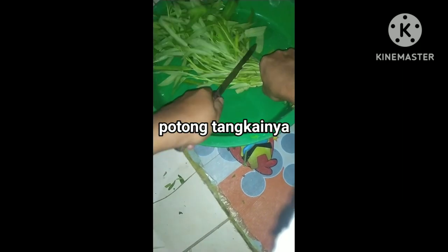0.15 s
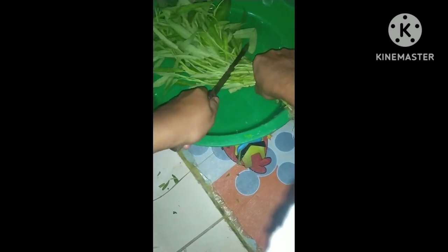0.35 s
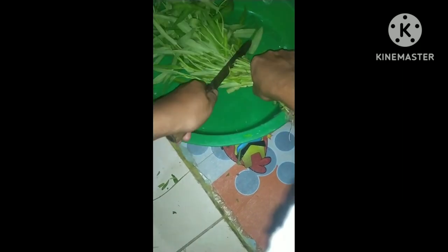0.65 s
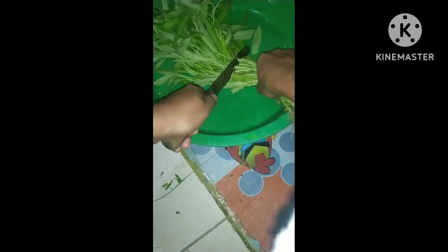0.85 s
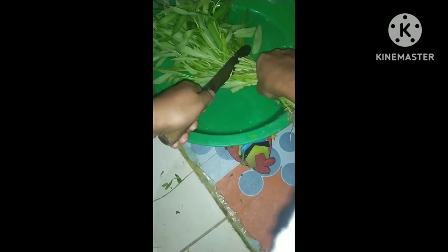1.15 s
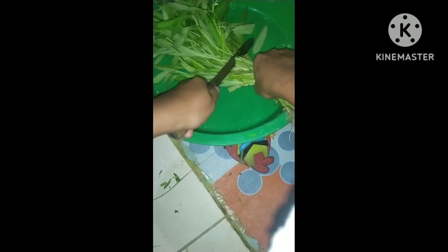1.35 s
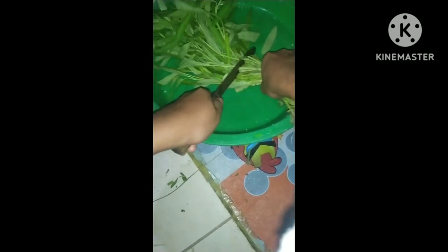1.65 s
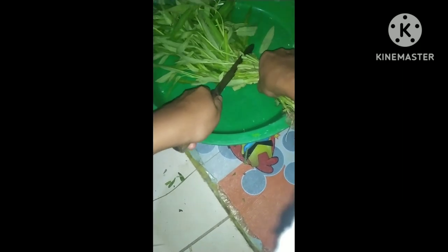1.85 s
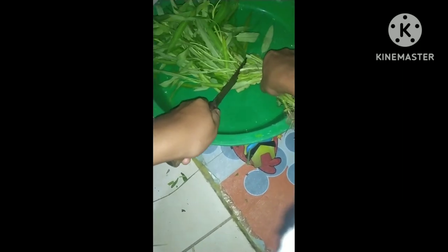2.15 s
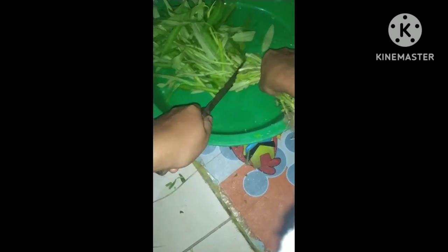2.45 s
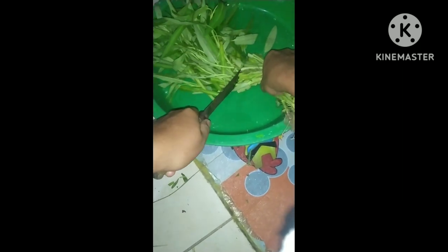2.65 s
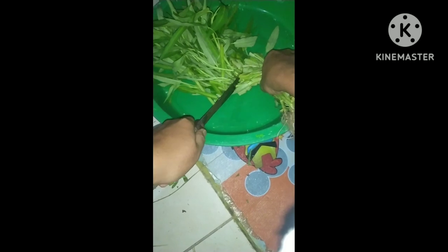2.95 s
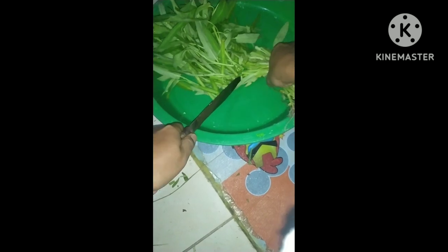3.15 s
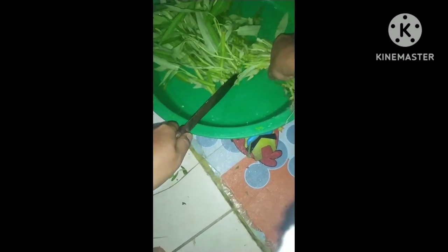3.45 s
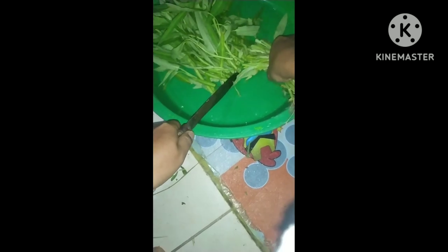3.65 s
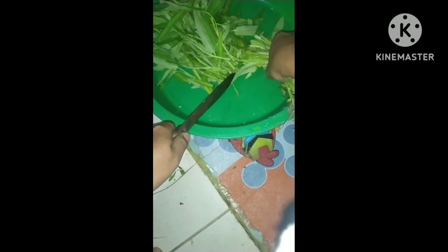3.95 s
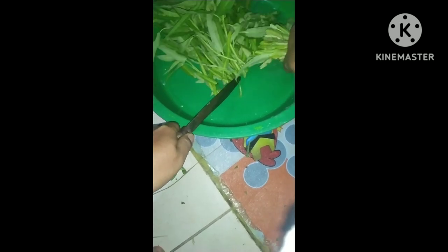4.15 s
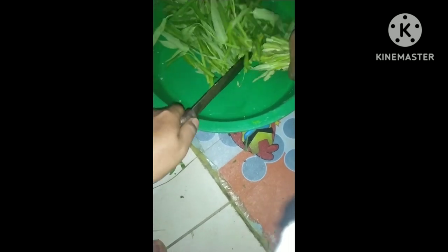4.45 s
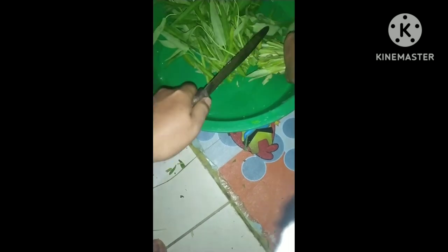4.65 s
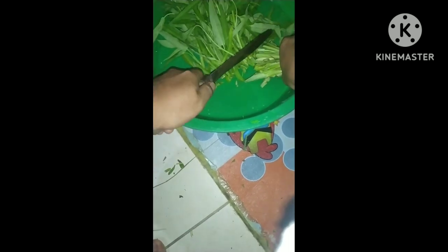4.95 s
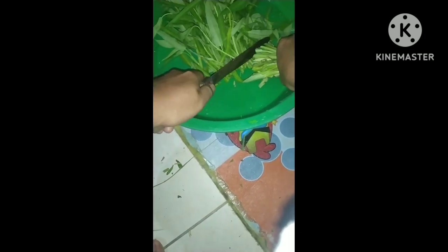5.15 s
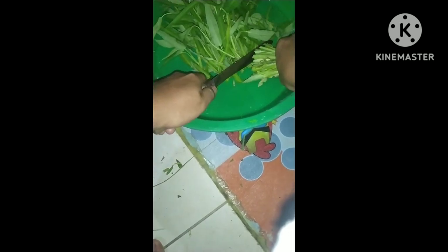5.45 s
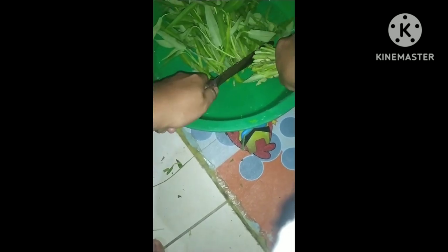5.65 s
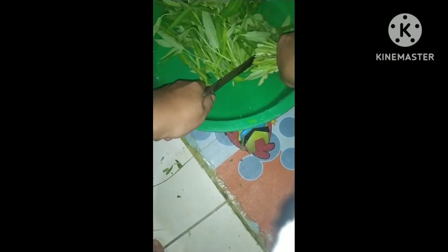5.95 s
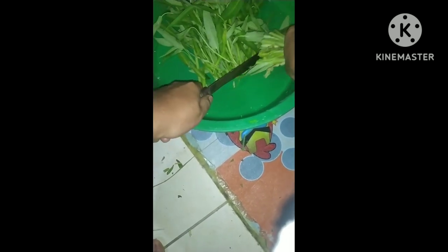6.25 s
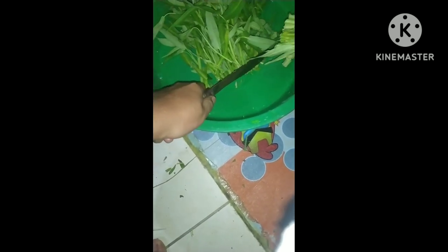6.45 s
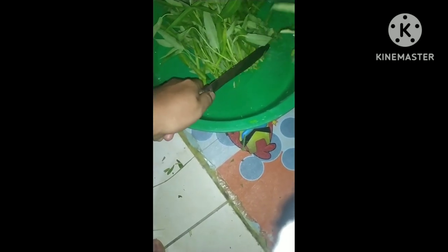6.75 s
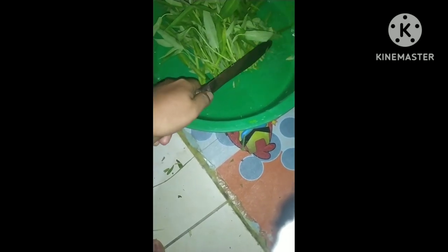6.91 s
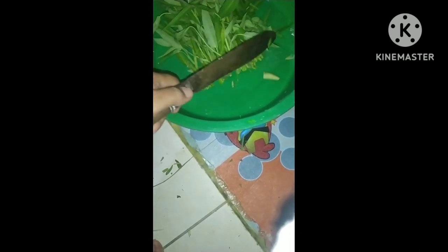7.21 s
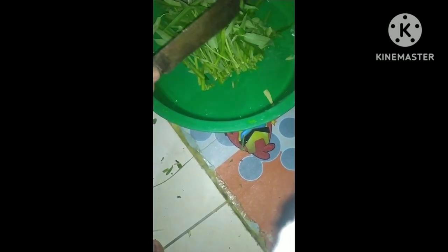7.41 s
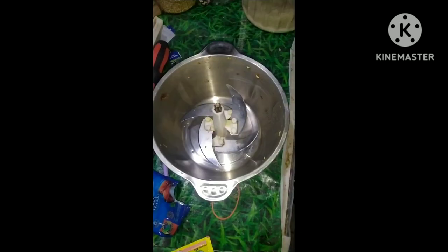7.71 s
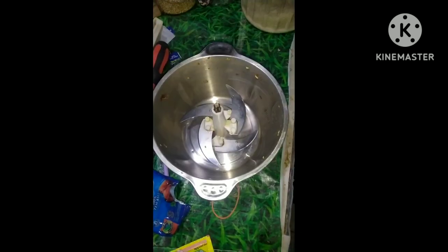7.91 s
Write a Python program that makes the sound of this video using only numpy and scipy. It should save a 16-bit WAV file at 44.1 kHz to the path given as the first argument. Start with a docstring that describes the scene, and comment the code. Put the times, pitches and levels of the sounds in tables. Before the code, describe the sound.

Irregular fibrous crunches, woody little snaps and blade rasps from stems being cut, clearer and brighter on the left, duller on the right, with short hard room reflections. After three seconds of busy cutting come dull case knocks and plastic bowl taps, a quiet gap, a few more crunches around six seconds, then soft swishes of hands and leaves. Faint deep motor hum and slight hiss run underneath until a late drop.

```python
"""A motor hums and throbs as a knife starts pressing through crisp leafy stems over a plastic bowl in a tiled room.
Leaves and fibres are coloured grains, snaps and late faint ticks are bursts of clicks, bowl and mic case ring modes.
Squeaks, a drone swell, blade rasps, case bumps, bowl taps and brushing hands follow; the hum drops near the end.
The left microphone faces the bowl; the right one is shadowed and slightly late."""
import sys
import numpy as np
from scipy import signal
from scipy.fft import rfft, irfft
from scipy.io import wavfile
from scipy.ndimage import uniform_filter1d

SR = 44100
rng = np.random.default_rng(int(sys.argv[2]) if len(sys.argv) > 2 else 0)


def materialize(psi):
    """Save the field psi as 16-bit PCM at rate SR to the path in sys.argv[1].

    A 1-D psi becomes a single channel; in a 2-D psi each row is a channel.
    """
    bounded = np.clip(np.atleast_2d(psi).T, -1, 1)
    quanta = np.round(bounded * 32767).astype(np.int16)
    wavfile.write(sys.argv[1], SR, quanta)


N = 356239
HIT = SR // 4
HIT_T = np.arange(HIT) / SR

# background spectra, before a common trim: [hz, level_db]
AIR_LEFT = [(20, -35), (36, -28.5), (50, -6), (75, -10), (105, -15), (130, -19.5), (190, -18), (300, -29),
            (420, -19), (520, -27), (620, -35), (1200, -35), (2800, -47), (15000, -51.5)]
AIR_RIGHT = [(20, -47.5), (36, -29), (50, -10.5), (75, -13.5), (105, -15), (130, -22), (190, -24),
             (300, -30), (420, -41.5), (620, -36.5), (1200, -43), (2800, -46.5), (15000, -51)]
# motor harmonics: [multiple of HUM_HZ, left_rms_db, right_rms_db]
HUM = [(1, -58, -58), (2, -61, -62.5), (3, -65.5, -67), (4, -76.5, -80.5), (8, -69.5, -80), (9, -69.5, -79),
       (10, -63, -87)]
HUM_HZ, HUM_WOW_SHARE, HUM_WAVER_DB = 49.02, 0.0007, 1.0
# motor throb, relative to its base levels: [time_s, level_db]
THROB = [(0, 2.5), (4, 0.5), (4.9, 7.5), (5.8, -3.5), (6.6, 4), (7.9, 6.5)]
# late drop of the background; hiss drop includes the harmonics
HUSH_S, HUSH_FADE_S, HUSH_THROB_DB, HUSH_HISS_DB = 7.88, 0.059, -22, -10

# blade pushes and bunch shifts: [start_s, hold_s, rustle_db, crackle_db]
STROKES = [(0.0, 0.12, -56, -61), (0.235, 0.061, -52.5, -61.5), (0.433, 0.095, -51.5, -64.5),
           (0.637, 0.079, -52.5, -69), (0.815, 0.17, -55, -64), (1.444, 0.24, -54, -66.5),
           (1.596, 0.12, -48.5, -63), (1.738, 0.11, -55, -76), (2.027, 0.08, -47, -57),
           (2.197, 0.049, -55, -64), (2.349, 0.053, -54, -70), (2.538, 0.15, -53.5, -66),
           (2.779, 0.075, -50, -60.5), (3.069, 0.063, -48, -62), (3.383, 0.069, -54, -76),
           (3.942, 0.18, -61, -77), (4.144, 0.18, -57, -66), (4.35, 0.49, -68.5, -79),
           (5.925, 0.028, -53, -76), (6.036, 0.12, -50.5, -75), (6.261, 0.011, -55.5, -68),
           (6.327, 0.027, -55.5, -66), (6.444, 0.62, -70.5, -86)]
ATTACK_S, RELEASE_S = 0.039, 0.043
# restless bunch between strokes
IDLE_RUSTLE_DB, IDLE_CRACKLE_DB = -84, -77
# relative colour of rubbed leaves: [hz, level_db]
RUSTLE = [(200, -1), (600, -8.5), (950, -2), (1450, 1.5), (1900, -8.5), (2300, -9.5), (2900, -18.5),
          (4500, -22), (7000, -37), (16000, -38.5)]
# hollow resonance of rubbed stems, dB re plain rustle
RASP_HZ, RASP_WIDTH_HZ, RASP_DB = 1510, 120, -5.5

# stems snapping and, late on, faint ticks of flicked leaves or handling:
# [time_s, body_peak_db, crack_db re body, hollow_pitch_hz]
SNAPS_AND_TICKS = [(0.0057, -46.5, 0.5, 1620), (0.0576, -42.5, -1.5, 1380), (0.1092, -36.5, -1.5, 1340),
                   (0.124, -50, 5, 1400), (0.1286, -43.5, 7, 1240), (0.2565, -37, -11, 1480),
                   (0.2593, -34.5, -5.5, 1610), (0.319, -43, 3, 920), (0.3399, -49.5, 4, 1630),
                   (0.472, -37, -24, 1440), (0.486, -37, -4, 1390), (0.6344, -39.5, 1.5, 1490),
                   (0.678, -48, -1, 1450), (0.686, -35.5, -20, 1100), (0.703, -42.5, -16, 1400),
                   (0.797, -39, -20, 1460), (0.827, -44.5, -31, 1540), (0.8514, -39.5, 0, 1350),
                   (0.8831, -40.5, 5.5, 1210), (0.935, -37.5, -9.5, 1430), (0.9475, -40.5, 4.5, 1240),
                   (0.977, -42.5, 1, 1170), (1.63, -35.5, -19, 1240), (1.674, -44, -12, 2030),
                   (1.7725, -28.5, -12, 1420), (1.975, -34.5, -12, 1150), (2.012, -38.5, 1.5, 1480),
                   (2.026, -41, -6, 1700), (2.031, -41, -17, 1350), (2.038, -45, 2.5, 1500),
                   (2.047, -37, -2.5, 1220), (2.058, -41, -8, 1400), (2.0862, -31.5, -9.5, 1390),
                   (2.1068, -31, -12, 1550), (2.121, -50, 3, 1400), (2.156, -41.5, -3, 1510),
                   (2.1611, -47.5, -3, 1600), (2.194, -51, 0, 1510), (2.201, -37, -2.5, 1300),
                   (2.212, -46, 2, 1620), (2.222, -43.5, -11, 1650), (2.352, -51, -8, 1700),
                   (2.368, -43.5, -15, 1490), (2.525, -52, 4, 1400), (2.53, -50, 4, 1510),
                   (2.555, -39.5, -5, 1620), (2.571, -32.5, -3.5, 1450), (2.599, -31, 5, 1240),
                   (2.611, -35, -4, 1400), (2.6778, -38.5, -1, 1600), (2.747, -36, -4.5, 940),
                   (2.7688, -31, -9.5, 1450), (2.7942, -45, -0.5, 1240), (2.825, -38, -7, 1100),
                   (2.836, -33, -12.5, 1080), (3.022, -45.5, -1.5, 1415), (3.048, -35, -22, 1400),
                   (3.055, -37, -8.5, 1480), (3.0701, -14.5, -8.5, 1350), (3.08, -34, -21, 1550),
                   (3.086, -30.5, -7, 1480), (3.094, -31, -13, 1470), (3.1095, -34, -9, 1500),
                   (3.124, -40, -6, 1490), (3.13, -36, -5, 1420), (3.143, -37.5, -14, 1530),
                   (3.158, -48, -6, 1510), (3.175, -43, 0.5, 1390), (4.2717, -27.5, -12, 1460),
                   (4.773, -54, -17, 1480), (4.851, -61, -18, 1520), (5.537, -55, -23, 1310),
                   (5.702, -53, -13, 970), (5.843, -52, -17, 1430), (5.921, -31, -6, 1520),
                   (5.928, -38.5, -16, 1100), (6.002, -28.5, -21, 1580), (6.0365, -33, -11, 1490),
                   (6.059, -37, -21, 1500), (6.075, -39, -21, 1450), (6.101, -38, -16, 1510),
                   (6.2586, -42, -16.5, 1720), (6.34, -38.5, -15, 1510), (6.3503, -29, -11, 1550),
                   (6.368, -41, -25, 1510), (6.493, -50, -37, 1570), (6.711, -57, -24, 1170),
                   (6.847, -54, -22, 1200), (7.362, -56, -15, 1420), (7.802, -52, -12, 1390)]
# relative colours of a snap or tick: [hz, level_db]; CRACK also colours the fibres
SNAP_BODY = [(100, -40), (330, -7), (480, 4.5), (650, -11.5), (1000, 2), (1250, -2), (1540, 3.5),
             (1850, -2.5), (2350, -11.5), (2900, -16), (3700, -10.5), (5500, -26.5), (15000, -42.5)]
CRACK = [(300, -6), (900, -1), (1800, 6), (2400, 4), (2800, 2), (3250, -4.5), (3700, -0.5), (4100, -1),
         (4550, -2.5), (5300, -6.5), (7500, -6.5), (11500, -13), (13300, -11), (16000, -12)]
# 60 dB decay of the bursts, longer when loud
BREAK_S, BREAK_OCT_PER_DB = 0.0088, 0.13
HOLLOW_WIDTH_HZ = 210
# treble limit of a middling stem; crisp raises it, thick lowers it
CRACK_TOP_HZ, MIDDLING_DB, MIDDLING_CRACK_DB = 9700, -22, -9.5
CRISP_OCT_PER_DB, THICK_OCT_PER_DB = 1.08, 0.18
# crack resonance, different each time
FIBRE_HZ, FIBRE_SCATTER_OCT = 3800, 0.55
# fibres that outlast the break
LAST_FIBRES_PER_S, LAST_FIBRES_DB, LAST_FIBRES_S = 120, -23, 0.022
# thin stems: peak re stroke rustle, crack re crackle-to-rustle balance
THIN_DB, THIN_CRACK_DB = -2, 10.5
STEM_HZ, STEM_SCATTER_OCT = 1500, 0.2

# faint squeaks: [time_s, peak_db, pitch_hz, length_s]
SQUEAKS = [(0.664, -53, 633, 0.12), (1.59, -51, 866, 0.1)]
# one drone swell: [start_s, hold_s, level_db, centre_hz]
DRONE_SWELL = (1.1, .27, -58.5, 420)
# blade sliding along wet stems: [start_s, hold_s, level_db, rasp_pitch_hz]
SLIDES = [(1.436, 0.033, -54.5, 1410), (2.03, 0.1, -55, 1400), (3.415, 0.077, -56.5, 1470),
          (3.93, 0.13, -72, 1370), (4.134, 0.17, -59, 1470), (4.325, 0.12, -58.5, 1520),
          (6.032, 0.086, -54, 1470)]
SLIDE_WIDTH_HZ, SLIDE_WANDER_OCT, SLIDE_ROUGH_DB = 300, 0.06, 3.5

# case bumps, before layer trims: [time_s, level_db, tick_db re level, sway_db re level, sway_hz, tick_top_hz]
BUMPS = [(1.7153, -20, 3.5, -5, 69, 16000), (3.3418, -19, 1, -5, 66, 15600),
         (3.3645, -24.5, 9, 2, 85, 7000), (3.387, -32, -1, -1, 147, 6960),
         (3.392, -27.5, 0.5, -0.5, 148, 7100), (4.385, -29, 4, 4, 77, 16000),
         (4.3996, -24, 3.5, 1.5, 73.5, 15000), (4.4866, -19, 0.5, -3, 107, 14000),
         (4.4959, -31, 9.5, -11, 146, 9000), (4.504, -38.5, -15, -7, 161, 9000),
         (4.5159, -33, -4, 2, 101, 12000), (4.523, -31, -5, -3, 99, 13000)]
# case modes, before scatter: [hz, level_db, t60_s]
CASE = [(200, -6.5, 0.016), (257, -5, 0.0268), (348, 2.5, 0.022), (448, 1, 0.038), (714, -7.5, 0.019),
        (1054, -5.5, 0.012)]
# relative colours of tick and dull knock: [hz, level_db]
TICK = [(600, -50), (1600, 9), (2400, 8.5), (3300, 8.5), (5000, -7), (7200, -6.5), (9500, 1.5),
        (12500, 0.5), (16000, 6.5)]
KNOCK = [(25, -17.5), (60, 12.5), (200, -3), (400, -10.5), (600, -6), (950, -16), (1300, -21.5),
         (3000, -31.5), (16000, -28)]
SWAY_T60_S = 0.069

# bowl taps, before layer trims: [time_s, level_db, brightness_cutoff_hz]
TAPS = [(3.546, -27, 1190), (3.5521, -30, 1110), (3.629, -44.5, 1400), (3.645, -40, 1310),
        (3.691, -42, 1280), (4.2703, -24.5, 1730), (4.284, -33.5, 1420)]
# bowl modes, before scatter and touch damping: [hz, level_db, t60_s]
BOWL = [(369, -3.5, 0.05), (522, -12.5, 0.15), (695, -7, 0.073), (911, -0.5, 0.045), (1029, -7, 0.1),
        (1130, -6.5, 0.14), (1173, -11, 0.044), (1359, -3.5, 0.041), (1472, 4, 0.036), (1686, -8, 0.096),
        (1973, 0, 0.028), (2236, -5, 0.05), (2380, -21.5, .05)]

# hands and loose leaves lifting away: [start_s, hold_s, swish_db]
LIFTING = [(6.473, 0.36, -72), (7.05, 0.016, -61), (7.148, 0.015, -62.5), (7.235, 0.032, -58),
           (7.292, 0.018, -65), (7.363, 0.059, -61), (7.695, 0.01, -67), (7.74, 0.025, -60),
           (7.8, 0.028, -59.5), (7.867, 0.016, -62.5)]
# relative colour of the swish: [hz, level_db]
SWISH = [(200, -11), (500, 3.5), (750, 2), (1400, 0), (2100, -5), (3200, -15.5), (4500, -11), (6500, -22),
         (15000, -29)]

# head-on to shadowed side: [hz, gain_db]
SHADOW = [(100, -13.5), (450, -8.5), (700, -29), (920, -14), (1200, -26.5), (2200, -25), (3500, -22),
          (7000, -13), (15000, -14)]
ROOM_T60_S, TREBLE_T60_S = 0.45, 0.18
# left microphone port resonance
PORT_HZ, PORT_WIDTH_HZ, PORT_DB = 14300, 2300, -7
CUTOFF_HZ = 15900


def from_db(db):
    """Decibels to gain."""
    return 10 ** (np.asarray(db) / 20)


def rms_one(x):
    """Scale to rms 1."""
    return x / np.sqrt(np.mean(x ** 2) + 1e-20)


def peak_one(x):
    """Scale so that the loudest 3 ms carry the power of a sine of height 1."""
    return x / np.sqrt(2 * uniform_filter1d(x ** 2, size=132).max() + 1e-20)


def in_time(rows):
    """Join the rows of a curve by straight lines, one array a column."""
    s, *columns = np.transpose(rows)
    return [np.interp(np.arange(N) / SR, s, c) for c in columns]


def at_hz(points, hz):
    """Read a spectrum on a log-frequency axis."""
    f, value = np.transpose(points)
    return np.interp(np.log(np.maximum(hz, 1)), np.log(f), value)


def response(points, size=4096):
    """Minimum-phase impulse response with the given spectrum."""
    level_db = at_hz(points, np.fft.rfftfreq(size, 1 / SR))
    cepstrum = irfft(np.log(from_db(level_db)))
    # fold onto positive time
    cepstrum[1:size // 2] *= 2
    cepstrum[size // 2 + 1:] = 0
    return irfft(np.exp(rfft(cepstrum)))


def through(x, impulse):
    """Pass a sound through an impulse response."""
    return signal.oaconvolve(x, impulse)[:len(x)]


def cut(x, hz, kind, order=2):
    """Low- or high-pass."""
    sos = signal.butter(order, min(hz, SR / 2 - 100), kind, fs=SR, output="sos")
    return signal.sosfilt(sos, x)


def resonance(x, hz, width_hz):
    """Two-pole band resonance with a gain of about 1 on top."""
    r = np.exp(-np.pi * width_hz / SR)
    zeros = np.array([1, 0, -1]) * (1 - r * r) / 2
    poles = [1, -2 * r * np.cos(2 * np.pi * hz / SR), r * r]
    return signal.lfilter(zeros, poles, x)


def dying(t60_s):
    """Envelope that falls 60 dB in t60_s."""
    return from_db(-60 * HIT_T / max(t60_s, 1e-4))


def drift(rate_hz):
    """Slow random curve of rms 1, with rate_hz knots a second."""
    knots = rng.standard_normal(1024)
    return rms_one(np.interp(np.arange(N) / SR * rate_hz, np.arange(len(knots)), knots))


def add(track, s, sound):
    """Mix a sound into a track at a time."""
    start = int(np.clip(s * SR, 0, N - 1))
    track[start:start + len(sound)] += sound[:N - start]


def struck(modes, scatter_db):
    """Modes set ringing by one blow, randomly scattered in strength, alternating in sign."""
    out = np.zeros(HIT)
    for k, (hz, db, t60_s) in enumerate(modes):
        gain = from_db(db + scatter_db * rng.standard_normal())
        out += gain * dying(t60_s) * np.sin(2 * np.pi * hz * HIT_T) * (-1) ** k
    return out


def grains(size, per_s, spread_db):
    """Random tiny clicks, mostly weak and a few strong."""
    born = rng.random(size) < per_s / SR
    strength = from_db(spread_db * np.minimum(rng.exponential(1, size), 4))
    return born * strength * rng.choice([-1, 1], size)


def gesture(start, hold_s):
    """Gain of one hand movement: sets in ahead of start, holds, then lets go."""
    t = np.arange(N) / SR - start
    setting_in = np.exp(-(np.minimum(t, 0) / ATTACK_S) ** 2)
    return setting_in * np.exp(-np.maximum(t - hold_s, 0) / RELEASE_S)


def flutter(x, first_db, round_db):
    """Sound bounces once off the bowl's floor, then to and fro between its walls."""
    floor_lag, wall_lag = 70, 170  # samples
    y = x + from_db(first_db) * np.concatenate([np.zeros(floor_lag), x[:-floor_lag]])
    return signal.lfilter([1], np.r_[1, np.zeros(wall_lag - 1), -from_db(round_db)], y)


def hush():
    """Share of the late background drop, 0 to 1."""
    return np.clip((np.arange(N) / SR - HUSH_S) / HUSH_FADE_S, 0, 1)


def motor_hum():
    """Harmonics of one wavering turning rate, each wavering in level."""
    phase = 2 * np.pi * np.cumsum(HUM_HZ * (1 + HUM_WOW_SHARE * drift(4))) / SR
    hum = np.zeros((2, N))
    for k, left_db, right_db in HUM:
        tone = np.sqrt(2) * np.sin(k * phase + 2 * np.pi * rng.random())
        hum += from_db([[left_db], [right_db]]) * tone * from_db(HUM_WAVER_DB * drift(6))
    return hum


def motor_throb():
    """Narrow-band noise at 51 Hz, alike on both sides, following its level curve."""
    level_db = in_time(THROB)[0] + HUSH_THROB_DB * hush()
    throb = rng.standard_normal(N)
    for _ in range(2):
        throb = resonance(throb, 51.0, width_hz=17.0)
    return from_db(level_db) * from_db([[-52], [-54]]) * rms_one(throb)


def air():
    """Rumble and hiss: coloured noise whose bass is shared by both sides."""
    shared, sides = cut(rng.standard_normal(N), 197, "low"), []
    for colour in (AIR_LEFT, AIR_RIGHT):
        own = cut(rng.standard_normal(N), 120, "high", order=1)
        sides.append(through(shared + own, response(colour)))
    return from_db(-18.5) * np.array(sides)


def background():
    """Motor and air, dropping near the end."""
    return (air() + motor_hum()) * from_db(HUSH_HISS_DB * hush()) + motor_throb()


def cutting():
    """Leaves rub in dense soft grains; fibres under the edge part in brighter clusters."""
    rustle, crackle = from_db(IDLE_RUSTLE_DB), from_db(IDLE_CRACKLE_DB)
    for start, hold_s, rustle_db, crackle_db in STROKES:
        push = gesture(start, hold_s)
        rustle = np.maximum(rustle, from_db(rustle_db) * push)
        crackle = np.maximum(crackle, from_db(crackle_db) * push)
    rubs = grains(N, per_s=1200, spread_db=3.0)
    tears = grains(N, per_s=700, spread_db=3.5)
    leaves = through(rubs * from_db(0.79 * drift(70)), response(RUSTLE))
    rasp = resonance(leaves, RASP_HZ, width_hz=RASP_WIDTH_HZ)
    leaves = rms_one(leaves + from_db(RASP_DB) * rasp)
    fibres = rms_one(through(tears * from_db(5.0 * drift(110)), response(CRACK)))
    return rustle * leaves + crackle * fibres


def thin_stems(count):
    """Rows as in SNAPS_AND_TICKS: small snaps at random in each stroke, levels following the stroke's."""
    rows = []
    for start, hold_s, rustle_db, crackle_db in STROKES:
        crack_db = crackle_db - rustle_db + THIN_CRACK_DB
        places, sizes = rng.random(count), rng.standard_normal(count)
        for place, size in zip(places, sizes):
            pitch_hz = STEM_HZ * 2 ** (STEM_SCATTER_OCT * size)
            rows.append((start + place * hold_s, rustle_db + THIN_DB, crack_db, pitch_hz))
    return rows


def last_fibres(since):
    """Envelope of the small ragged bursts that follow a break."""
    parting = np.abs(grains(HIT, per_s=LAST_FIBRES_PER_S, spread_db=3))
    parting = parting * (since > .005) * np.exp(-np.abs(since) / LAST_FIBRES_S)
    smear = np.exp(-1 / (.0007 * SR))  # 0.7 ms per burst
    return from_db(LAST_FIBRES_DB) * signal.lfilter([1], [1, -smear], parting)


def snaps_and_ticks(rows):
    """A snap is an avalanche of clicks ringing a hollow and the bowl; faint ticks share the model."""
    out, body_colour, crack_colour = np.zeros(N), response(SNAP_BODY), response(CRACK)
    lead_s = .006
    since = HIT_T - lead_s
    # a few weak clicks come first
    creak = from_db(-21.5) * np.exp(np.minimum(since, 0) / 0.0033)
    for s, db, crack_db, hz in rows:
        loudness_db = db - MIDDLING_DB
        break_s = BREAK_S * 2 ** (BREAK_OCT_PER_DB * max(loudness_db, 0))
        collapse = from_db(-60 * np.abs(since) / break_s)
        collapse = collapse + from_db(-23.5) * np.exp(-np.abs(since) / 0.0054) + last_fibres(since)
        cells = grains(HIT, per_s=8200, spread_db=1.0) * np.where(since < 0, creak, collapse)

        pulse = through(cells, body_colour)
        hollow = peak_one(from_db(-18) * pulse + resonance(pulse, hz, width_hz=HOLLOW_WIDTH_HZ))
        upper = resonance(resonance(pulse, 2350, width_hz=1000), 2350, width_hz=1000)
        # louder events stir the upper resonance more
        upper = from_db(db + 13) * peak_one(upper)
        body = peak_one(flutter(hollow + upper, first_db=-12, round_db=-9))

        tear = through(cells, crack_colour)
        fibre_hz = FIBRE_HZ * 2 ** (FIBRE_SCATTER_OCT * rng.standard_normal())
        tear = tear + resonance(tear, fibre_hz, width_hz=580)
        crisp_oct = CRISP_OCT_PER_DB * (crack_db - MIDDLING_CRACK_DB)
        top_hz = CRACK_TOP_HZ * 2 ** (crisp_oct - THICK_OCT_PER_DB * loudness_db)
        crack = peak_one(cut(tear, top_hz, "low"))

        bowl = peak_one(cut(struck(BOWL, scatter_db=2.5), 330, "high"))
        add(out, s - lead_s, from_db(db) * (body + from_db(crack_db) * crack))
        add(out, s, from_db(db - 5.5) * bowl)
    return out


def squeaks():
    """Short thin sine tones that swell and fade."""
    out = np.zeros(N)
    for s, db, hz, length_s in SQUEAKS:
        swell = np.sin(np.pi * np.minimum(HIT_T / length_s, 1))
        add(out, s, from_db(db) * swell * np.sin(2 * np.pi * hz * HIT_T))
    return out


def drone_swell():
    """A drone of resonant noise swells for a moment."""
    start, hold_s, db, hz = DRONE_SWELL
    drone = resonance(resonance(rng.standard_normal(N), hz, width_hz=210), hz, width_hz=180)
    return from_db(db) * gesture(start, hold_s) * rms_one(drone)


def sliding():
    """The blade sticks and slips along the stems; the slips ring a resonance that wanders in pitch."""
    out = np.zeros(N)
    slips = grains(N, per_s=700, spread_db=3) * from_db(SLIDE_ROUGH_DB * drift(60))
    # reading the rasp at an uneven pace bends its pitch
    travel = np.cumsum(2 ** (SLIDE_WANDER_OCT * drift(25)))
    for start, hold_s, db, hz in SLIDES:
        rasp = resonance(resonance(slips, hz, width_hz=SLIDE_WIDTH_HZ), hz, width_hz=1050)
        wandering = np.interp(travel, np.arange(N), rms_one(rasp), right=0)
        out += from_db(db) * gesture(start, hold_s) * wandering
    return out


def bumps():
    """A dry tick, a dull knock and a short thump travel through the case to both microphones."""
    thumps, rings, ticks = np.zeros((3, N))
    tick_colour, knock = response(TICK), peak_one(response(KNOCK))
    for s, db, tick_db, sway_db, hz, top_hz in BUMPS:
        sway = np.sin(2 * np.pi * hz * HIT_T) * dying(SWAY_T60_S)  # case gives in the hand
        friction = rng.standard_normal(HIT) * dying(.005)
        tick = cut(through(friction, tick_colour), top_hz, "low")
        add(thumps, s, -from_db(db + sway_db) * sway)
        add(thumps, s, from_db(db - 6.0) * knock)
        add(rings, s, from_db(db - 3.5) * peak_one(struck(CASE, scatter_db=4.5)))
        add(ticks, s, from_db(db + tick_db - 12.5) * peak_one(tick))
    near = thumps + rings + ticks
    far = from_db(-3.0) * resonance(rings, 205, width_hz=560)
    far = far + from_db(-24.0) * thumps + from_db(-21) * ticks
    return cut(np.array([near, np.roll(far, SR // 1500)]), 57, "high")


def taps():
    """Knife and stems knock on the bowl: a scuff and its modes, dulled when the contact is soft."""
    out = np.zeros(N)
    for s, db, hz in TAPS:
        scuff = rng.standard_normal(HIT) * (dying(0.004) + from_db(-13.5) * dying(0.13))
        scuff = flutter(cut(scuff, 235, "high"), first_db=-36, round_db=-7)
        scuff = peak_one(cut(scuff, hz, "low", order=6))
        modes = struck(BOWL, scatter_db=2) * dying(0.33)  # blade's touch damps the wall
        ring = peak_one(cut(modes, hz, "low", order=4))
        add(out, s, from_db(db - 3.0) * scuff + from_db(db - 4.5) * ring)
    return out


def lifting():
    """Hands and loose leaves brush past in a broad, grainy swish."""
    swish = sum(from_db(db) * gesture(start, hold_s) for start, hold_s, db in LIFTING)
    brush = grains(N, per_s=1000, spread_db=4.0) * from_db(2.5 * drift(50))
    return swish * rms_one(through(brush, response(SWISH)))


def room(x, wet_db, early_db):
    """Early reflections, then a diffuse tail; the paths are redrawn every quarter second."""
    out, t = x.copy(), np.arange(SR // 2) / SR
    for start in range(0, N, HIT):
        dull = cut(rng.standard_normal(len(t)), 2800, "low") * np.exp(-np.log(1000) * t / ROOM_T60_S)
        bright = cut(rng.standard_normal(len(t)), 3100, "high")
        bright = bright * np.exp(-np.log(1000) * t / TREBLE_T60_S)
        tail = (dull + from_db(18.0) * bright) * (1 - np.exp(-t / 0.0012))
        early = rng.standard_normal(len(t)) * np.exp(-t / 0.0026) * (t > .002)
        early = cut(early, 3050, "low", order=1)
        paths = from_db(wet_db) * tail / np.linalg.norm(tail)
        paths = paths + from_db(early_db) * early / np.linalg.norm(early)
        add(out, start / SR, signal.fftconvolve(x[start:start + HIT], paths))
    return out


def scene():
    """The work at the bowl reaches the left microphone directly, the right one later and in shadow."""
    work = cutting() + snaps_and_ticks(SNAPS_AND_TICKS) + snaps_and_ticks(thin_stems(count=2))
    work = work + sliding() + taps() + lifting()
    left = room(work, wet_db=-7.5, early_db=-16.5) + squeaks() + drone_swell()
    left = left + from_db(PORT_DB) * resonance(left, PORT_HZ, width_hz=PORT_WIDTH_HZ)
    shadowed = through(room(work, wet_db=0.0, early_db=-5.0), response(SHADOW))
    right = np.roll(shadowed, SR // 11000)
    return np.array([left, right]) + bumps() + background()


def record(dry):
    """Steep elliptic low-pass at CUTOFF_HZ."""
    sos = signal.ellip(10, .2, 70, CUTOFF_HZ, fs=SR, output="sos")
    return signal.sosfilt(sos, dry)


dry = scene()
out = record(dry)
materialize(out)
```